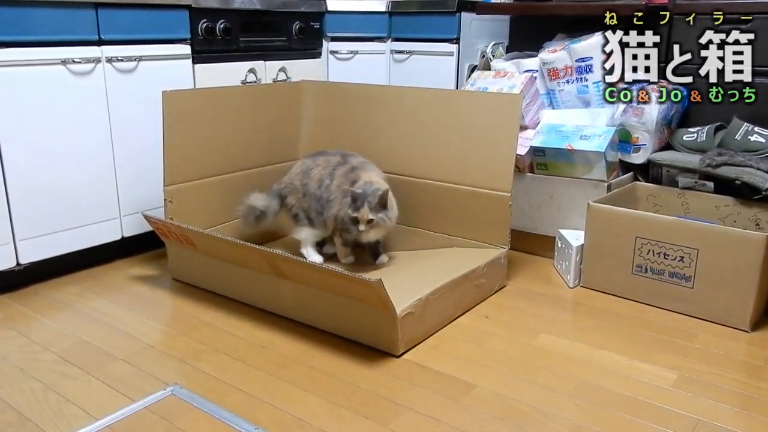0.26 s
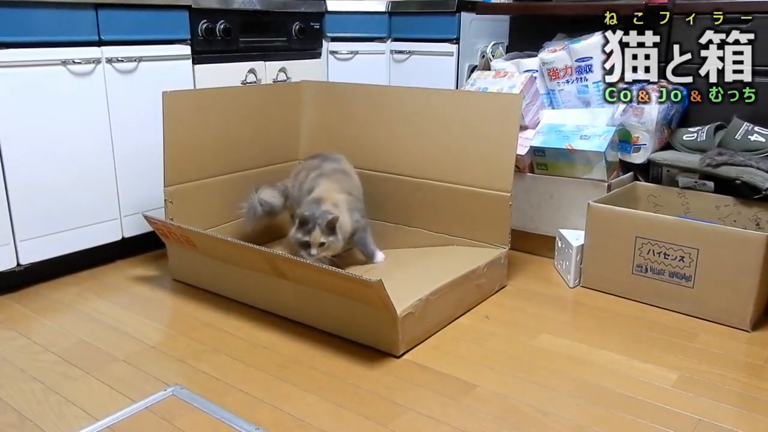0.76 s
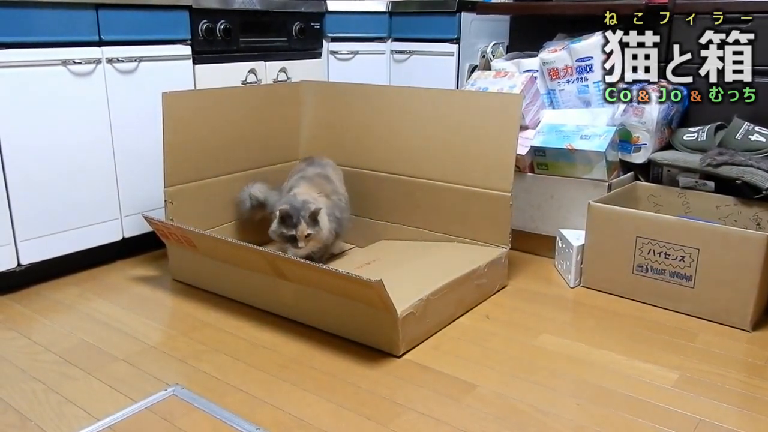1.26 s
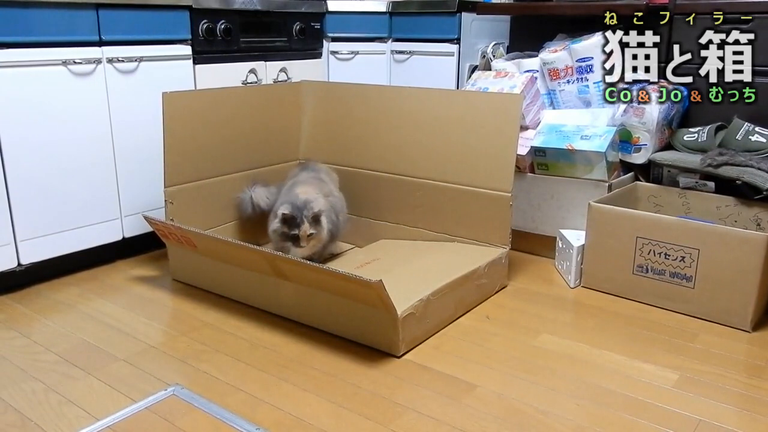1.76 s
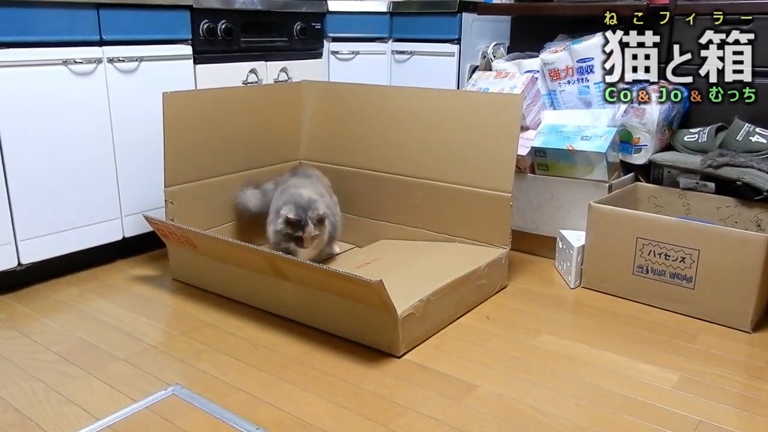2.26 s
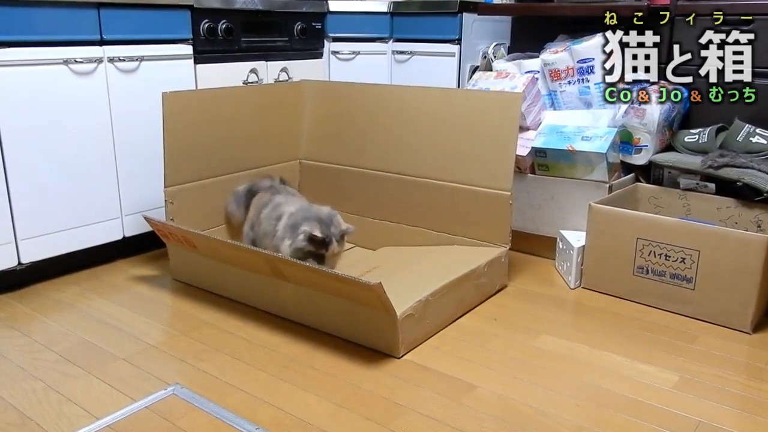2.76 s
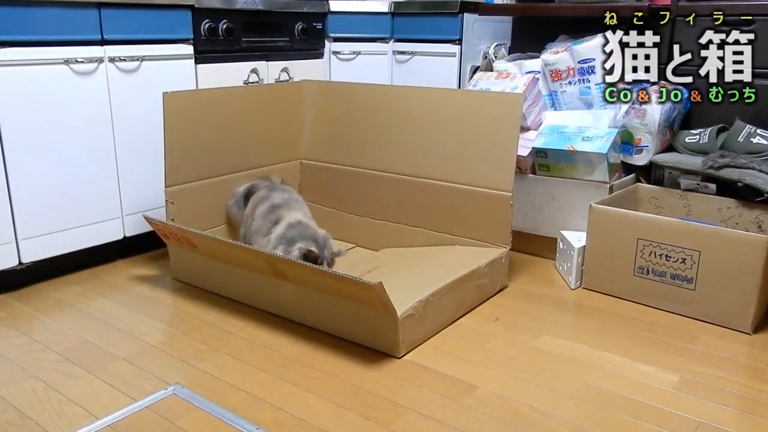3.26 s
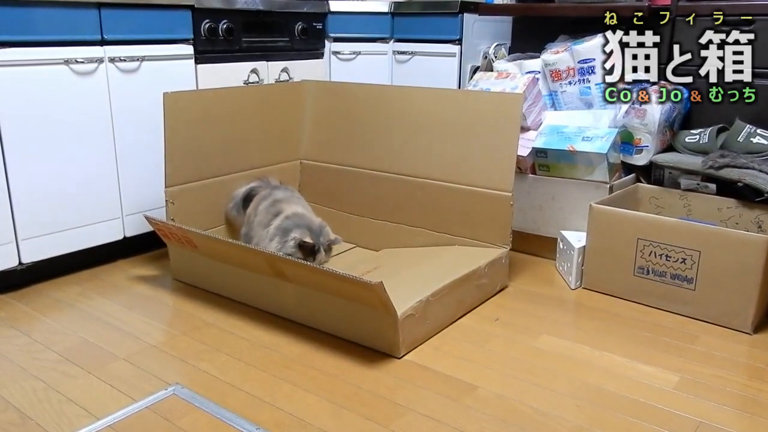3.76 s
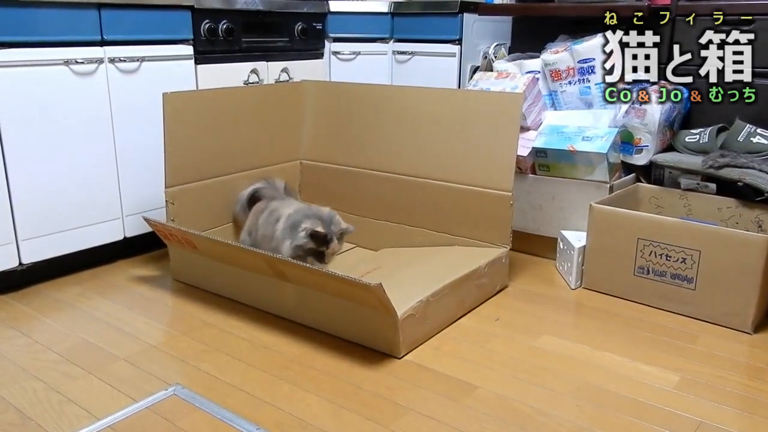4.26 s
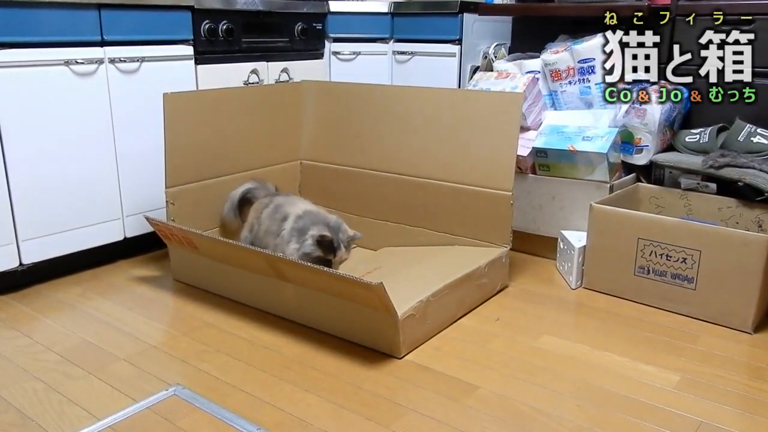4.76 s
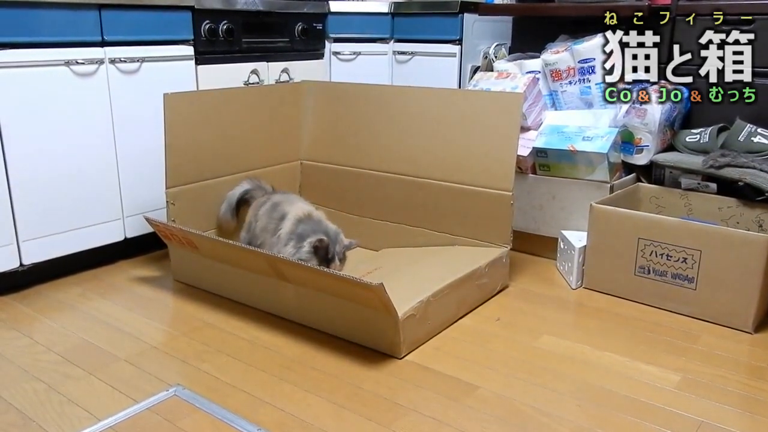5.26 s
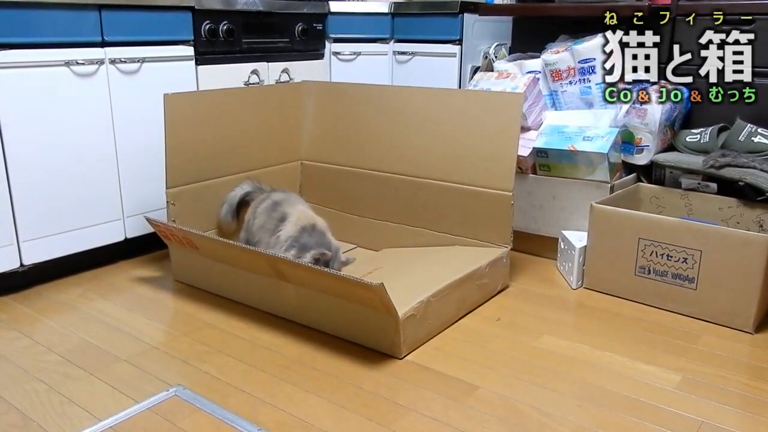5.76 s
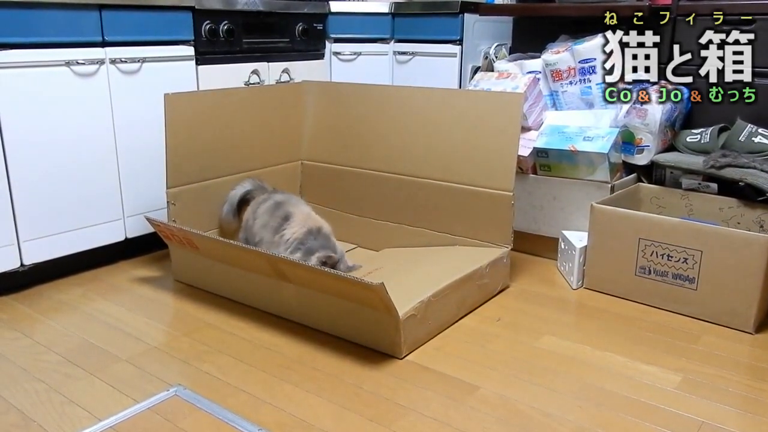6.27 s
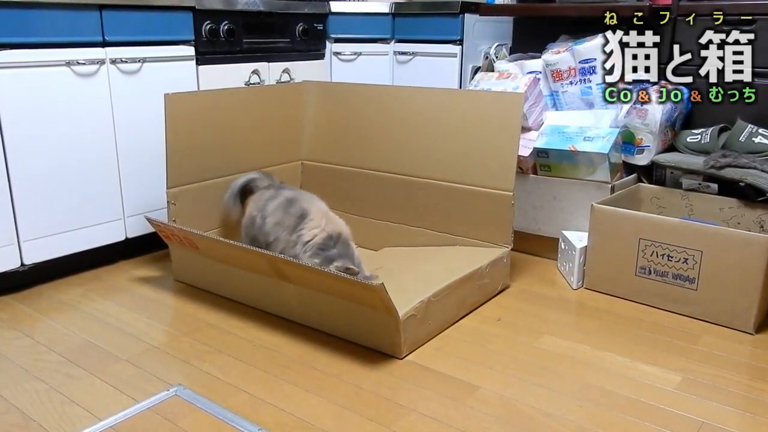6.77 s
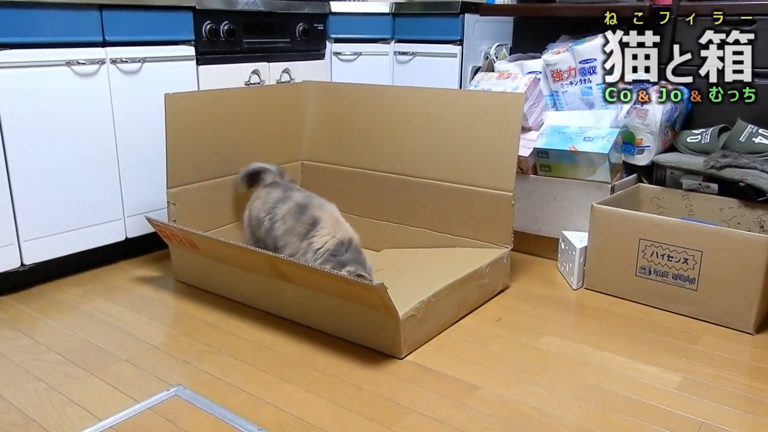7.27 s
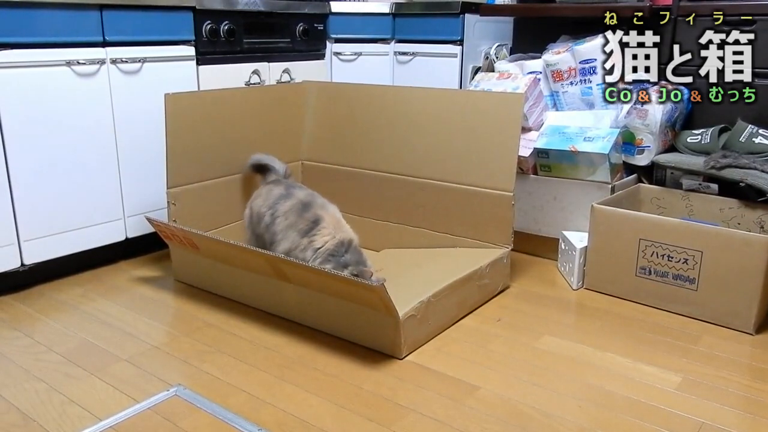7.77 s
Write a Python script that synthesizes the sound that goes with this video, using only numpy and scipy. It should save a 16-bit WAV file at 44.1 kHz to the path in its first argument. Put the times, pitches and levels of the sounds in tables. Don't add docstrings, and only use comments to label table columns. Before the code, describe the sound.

A low, airy fridge and fan hum runs throughout a small kitchen. At first only barely audible fur brushes and tiny collar tag clinks are heard. Then a cat slaps a large cardboard box, its tag jingling, and follows with rasping claw scrapes, light pats and several sharp, hollow whacks. A gentle brushing lull precedes two last thumps. The microphone is about two metres away, with a short hard-room echo.

```python
import sys
import numpy as np
from scipy import signal
from scipy.fft import rfft, irfft
from scipy.io import wavfile
from scipy.ndimage import uniform_filter1d

SR = 44100
rng = np.random.default_rng(int(sys.argv[2]) if len(sys.argv) > 2 else 0)


def voltage_ratio(level):
    return 10 ** (np.asarray(level, float) / 20)


def generate_wav(signal):
    frames = np.transpose(np.atleast_2d(signal))
    scaled = np.clip(frames, -1, 1) * 32767
    pcm = np.round(scaled).astype(np.int16)
    wavfile.write(sys.argv[1], SR, pcm)


N = 353241


def unit(x):
    return x / np.sqrt(np.mean(x ** 2))


def colour(x, table):
    hz, db = np.transpose(table)
    f = np.maximum(np.arange(len(x) // 2 + 1) * SR / len(x), 1)
    gain = voltage_ratio(np.interp(np.log(f), np.log(hz), db))
    return irfft(rfft(x) * gain, len(x))


def resonate(x, hz, q):
    return signal.lfilter(*signal.iirpeak(hz, q, SR), x)


def low_cut(x, hz):
    return signal.sosfilt(signal.butter(2, hz, "highpass", fs=SR, output="sos"), x)


def walk(rate):
    k = int(SR / rate)
    steps = np.repeat(rng.standard_normal(N // k + 1), k)
    return unit(uniform_filter1d(uniform_filter1d(steps, k), k)[:N])


# pitch_hz, level_db (per Hz)
HUM_SPECTRUM = [(16, -58), (28, -4), (54, -7.5), (322, -2), (409, -10.5), (480, -5), (578, -14.5),
                (754, -15.5), (1320, -28.5), (1460, -24.5), (1590, -21), (3710, -26.5), (6830, -36.5),
                (8680, -36.5), (16000, -46)]
HUM_DB = -49
# pitch_hz, width_hz, level_db (rms)
HOUSING = [(330, 47, -61), (480, 130, -65), (763.5, 13.4, -65), (976, 160, -64), (1474, 28, -68),
           (2005, 37, -72), (3750, 210, -72), (4700, 270, -76), (6080, 79, -79)]


def moving_air(waver):
    out = voltage_ratio(HUM_DB - 3.5) * waver * unit(colour(rng.standard_normal(N), HUM_SPECTRUM))
    for hz, width, db in HOUSING:
        out += voltage_ratio(db) * unit(resonate(rng.standard_normal(N), hz, hz / width))
    return out


# pitch_hz, level_db (rms)
MOTOR_TONES = [(118.4, -72), (769.8, -78)]
# pitch_hz, level_db (side minus mid)
HUM_WIDTH = [(60, -24), (110, -3), (200, -8.5), (380, -9.5), (700, -6), (1290, -14.5), (2380, -6),
             (4400, -6), (8120, 0.5), (15000, -1.5)]


def hum():
    t = np.arange(N) / SR
    waver = voltage_ratio(.7 * walk(6))
    tones = np.zeros(N)
    for hz, db in MOTOR_TONES:
        tones += voltage_ratio(db + 3 + 3 * walk(9)) * np.sin(2 * np.pi * hz * t)
    return moving_air(waver) + tones, colour(moving_air(waver), HUM_WIDTH)


# pitch_hz, t60_s
ROOM_T60 = [(100, 0.33), (500, 0.19), (2500, 0.23), (6000, 0.28), (12000, 0.12)]


def tail():
    t, out = np.arange(SR // 2) / SR, np.zeros(SR // 2)
    hz, t60 = np.transpose(ROOM_T60)
    for f in 60 * 2. ** np.arange(9):
        octave = [(f / 2, -40), (f / np.sqrt(2), -3), (f, 0), (f * np.sqrt(2), -3), (2 * f, -40)]
        band = colour(rng.standard_normal(len(t)), octave)
        decay_s = np.interp(np.log(f), np.log(hz), t60)
        out += band * voltage_ratio(-60 * t / decay_s) / np.sqrt(decay_s)
    out *= np.clip((t - .003) / 0.0066, 0, 1)
    return out / np.sqrt(np.sum(out ** 2))


# start_s, lean_right_db, echo_db
PLACES = [(0, -40, 0), (2.6, -32, 0), (2.96, -32, -0.5), (3.62, -30, 0.5), (4.2, -32, -1.5), (4.61, -34, 0),
          (4.9, -35, 1), (5.12, -29, 0.5), (5.52, -32, 0.5), (5.79, -32, 0), (6.2, -30, 0),
          (6.5, -34, -0.5), (7.54, -33, 0.5), (7.81, -32, 0)]
SHARED_ECHO_HZ = 1400


def echo(x, shared, tails):
    out = np.zeros(N + len(shared))
    edges = [int(row[0] * SR) for row in PLACES] + [N]
    bass = [(SHARED_ECHO_HZ, 0), (SHARED_ECHO_HZ * 1.1, -60)]
    for a, b, (_, _, db), fresh in zip(edges, edges[1:], PLACES, tails):
        answer = fresh + colour(shared - fresh, bass)
        out[a:b + len(shared) - 1] += voltage_ratio(db) * signal.fftconvolve(x[a:b], answer)
    return out[:N]


# start_s, length_s, level_db, pitch_hz
RATTLES = [
    (3.163, .25, -52, 7100),
    (3.484, .04, -49, 8100),
    (4.757, .005, -42, 7700),
    (4.7427, .004, -40, 7550),
    (4.7865, .004, -35, 7780),
    (2.7, .004, -34, 7900),
]
# start_s, level_db (peak), pitch_hz
SOFT_CLINKS = [(1.8513, -63, 6140), (1.8823, -53, 6380), (1.8848, -51, 6590), (1.8967, -51, 6710),
               (1.9217, -59, 6610), (1.9386, -51, 6700), (1.9755, -59, 6630), (1.989, -56, 6400),
               (2.0035, -52, 6550), (2.0344, -43, 6460), (2.1636, -51, 6620), (2.1811, -55, 6640),
               (2.221, -49, 6790), (2.2345, -50, 6640), (2.3023, -55, 6830), (2.3427, -55, 6820),
               (2.3662, -57, 6610), (2.4101, -48, 6610), (2.4899, -56, 7220), (2.5353, -57, 7130)]
# start_s, level_db (peak), pitch_hz
LOUD_CLINKS = [
    (2.7654, -39, 6480),
    (2.7888, -36, 6530),
    (2.7958, -32, 6480),
    (2.8192, -27, 6360),
    (2.8392, -33, 6700),
    (2.8571, -31, 6480),
    (2.8956, -30, 6510),
    (2.9285, -35, 6500),
    (2.9629, -34, 6520),
    (2.9918, -32, 6460),
]
TICK_GAP_S, TICK_SCATTER_DB, TICK_DETUNE = 0.015, 3, .008


def ticks():
    chance = rng.standard_normal((len(RATTLES), 3, 24))
    out = []
    for (s, length, db, hz), (gap, size, tune) in zip(RATTLES, chance):
        late = np.cumsum(TICK_GAP_S * np.exp(0.24 * gap)) - TICK_GAP_S * np.exp(.3 * gap[0])
        rattle = zip(s + late, db + TICK_SCATTER_DB * size, hz * (1 + TICK_DETUNE * tune))
        out += list(rattle)[:np.sum(late <= length)]
    return out + [(s, db - 6, hz) for s, db, hz in SOFT_CLINKS + LOUD_CLINKS]


def tag():
    out, t = np.zeros(N), np.arange(SR // 10) / SR
    for s, db, hz in ticks():
        turns = 2 * np.pi * hz * t
        modes = np.sin(turns) + .6 * np.sin(1.03 * turns) + .3 * np.sin(1.17 * turns)
        clink = modes * np.exp(-t / .003) + .3 * np.sin(turns) * np.exp(-t / .016)
        i = int(s * SR)
        out[i:i + len(t)] += voltage_ratio(db + 7.0) * clink * (1 - np.exp(-t / .0005))
    return out


# start_s, level_db, pitch_hz, t60_s
PLUCKS = [(4.7424, -50, 2510, 0.24), (4.7864, -44, 2520, 0.12), (4.9277, -37, 2470, 0.14),
          (5.8136, -41.5, 2370, 0.42), (6.0087, -36.5, 1970, 0.15), (6.5525, -47, 2110, 0.16),
          (7.1504, -41, 3130, 0.11), (7.1844, -46, 3060, 0.076), (1.1667, -61, 4900, 0.2),
          (4.9282, -36, 6140, 0.099), (5.1482, -32, 6540, 0.081), (7.1511, -42, 5100, 0.1),
          (7.2469, -48, 3750, 0.073), (7.725, -41, 5000, 0.093)]


def plucks():
    out, t = np.zeros(N), np.arange(SR // 4) / SR
    for s, db, hz, t60 in PLUCKS:
        noise = rng.standard_normal(len(t))
        band = unit(resonate(resonate(noise, hz, 11.0), hz, 11.0))
        i = int(s * SR)
        out[i:i + len(t)] += band * (1 - np.exp(-t / 0.004)) * voltage_ratio(db + 1.5 - 60 * t / max(t60, .02))
    return out


# start_s, level_db (peak), pitch_hz, t60_s
CATCHES = [(2.654, -12, 2840, 0.021), (2.9846, -29, 6860, 0.025), (3.1031, -27, 6690, 0.021),
           (3.7212, -12, 2600, 0.021), (3.7268, -12, 2180, 0.021), (4.321, -23, 3830, 0.025),
           (4.3284, -19.5, 3360, 0.025), (4.3435, -19, 2800, 0.025), (4.37, -17, 2500, 0.025),
           (4.392, -21, 2470, 0.025), (4.664, -28, 3200, 0.025), (4.677, -33, 2800, 0.025),
           (4.742, -33, 7550, 0.023), (4.786, -30, 7780, 0.023), (5.1471, -27, 3980, 0.025),
           (5.1576, -24, 5530, 0.025), (5.5497, -19, 2470, 0.021), (6.0051, -31, 2000, 0.025),
           (6.2499, -12, 2390, 0.022), (7.1544, -30, 5100, 0.023), (7.2454, -40, 3940, 0.025),
           (7.5824, -15, 2810, 0.021), (7.8379, -12.5, 2680, 0.023)]


def catches():
    out, t = np.zeros(N), np.arange(SR // 20) / SR
    for s, db, hz, t60 in CATCHES:
        noise = rng.standard_normal(len(t))
        band = unit(resonate(resonate(noise, hz, 1.5), hz, 1.8))
        i = int(s * SR)
        out[i:i + len(t)] += band * (1 - np.exp(-t / 0.00039)) * voltage_ratio(db - 5.5 - 60 * t / max(t60, .005))
    return out


# start_s, level_db, pitch_hz, t60_s
THUDS = [(2.652, -23.5, 122, 0.34), (2.699, -19, 200, 0.067), (2.797, -29, 113, 0.1),
         (3.706, -19.5, 199, 0.25), (4.343, -24, 161, 0.22), (4.643, -27.5, 178, 0.12),
         (4.924, -21.5, 160, 0.31), (5.535, -20, 206, 0.11), (5.812, -55, 199, 0.15),
         (6.006, -24, 199.5, 0.19), (6.232, -23, 197, 0.13), (7.558, -24, 162, 0.057),
         (7.823, -23, 250, 0.082), (7.834, -11.5, 204, 0.055), (7.566, -25, 269, 0.12),
         (3.78, -42, 52, 0.34), (6.26, -40, 55, 0.43), (2.653, -23, 268, 0.42), (4.926, -17, 276.5, 0.2),
         (2.668, -27, 91.4, 0.4), (2.77, -35, 78.1, 0.21), (2.87, -43, 57, 0.81), (4.359, -36.5, 90, 0.33),
         (7.565, -37, 96, 0.41), (6.24, -21, 197, .14), (5.545, -23, 200, .14), (7.87, -27, 225, .2),
         (7.59, -30, 240, .2), (4.94, -28, 200, .15)]
# start_s, level_db, pitch_hz, t60_s
KNOCKS = [(2.656, -19, 545, 0.14), (2.727, -33, 530, 0.1), (2.793, -22.5, 548, 0.089),
          (2.985, -29, 628, 0.23), (3.103, -40, 700, 0.09), (3.507, -33, 582, 0.097),
          (7.745, -39, 480, 0.08), (3.29, -30.5, 539, 0.27), (3.714, -15.5, 542, 0.11),
          (5.538, -22, 580, 0.071), (6.237, -9, 583, 0.062), (7.572, -24, 350, 0.14),
          (7.565, -23, 615, 0.091), (7.562, -24, 930, .04), (7.838, -19, 590, .08), (7.852, -25, 300, .15),
          (7.835, -20, 800, 0.055), (3.712, -26, 355, .1), (3.71, -22, 272, .14), (3.71, -25, 1074, .08),
          (7.103, -39, 980, .04), (4.315, -32, 550, .05), (4.41, -30, 480, .08), (4.665, -26, 500, .08),
          (5.178, -29, 690, 0.088), (7.44, -41, 440, 0.11), (7.735, -34, 340, .1), (7.275, -41, 780, 0.11),
          (4.7, -24, 270, .12), (5.545, -24, 352, .12), (6.24, -22, 352, 0.13), (6.24, -22, 268, .12),
          (4.665, -33, 1200, .06)]


def thuds():
    out, t = np.zeros(N), np.arange(SR // 2) / SR
    for s, db, hz, t60 in THUDS + KNOCKS:
        turns = 2 * np.pi * hz * (t + 0.0023 * (1 - np.exp(-t / 0.055)))
        pair = np.sin(turns) + .35 * np.sin(.9 * turns)
        landing = pair * (1 - np.exp(-t / 0.00045)) * voltage_ratio(db + 1.0 - 60 * t / max(t60, .02))
        i = int(s * SR)
        out[i:i + len(t)] += landing[:N - i]
    return out


# start_s (full grip), hold_s, rub_db, pad_db (rel), claws_db (rel)
SCRAPES = [(2.681, 0.0043, -34.5, 1.5, 1.5), (2.762, .005, -45, 2.5, 5.5), (2.83, 0.043, -45, 1.5, 1),
           (2.984, 0.012, -37.5, 1, -5), (3.084, 0.2, -44.5, 6, 1.5), (3.352, 0.06, -46, 9, 0),
           (4.342, 0.048, -33, 0, 1.5), (4.4, 0.029, -40.5, 3.5, -4), (4.666, 0.012, -53, 6, -11),
           (3.03, 0.032, -48, 2, -1), (4.651, 0.0044, -44.5, 12, -1.5), (4.798, .005, -52.5, 2.5, 7),
           (5.162, 0.0061, -31, 1, -16), (5.223, 0.12, -43, 4.5, -2.3), (5.486, 0.0061, -51.5, 12.5, -1),
           (5.836, .005, -43.5, 10, 2.5), (5.944, 0.032, -57, 15.5, 1), (7.708, 0.012, -47.5, 7, -12)]
# start_s (full grip), hold_s, rub_db, pad_db (rel), claws_db (rel)
BRUSHES = [(0.926, 0.033, -70.5, 13.5, 11.5), (1.043, .02, -77.5, 20, 14), (1.16, 0.028, -64, -3, -0.5),
           (1.28, .02, -69.5, 14, -2), (1.95, .5, -80, 0, 17), (2.54, 0.068, -60.5, -7, 0.5),
           (3.507, 0.062, -68, 5, 12.5), (3.693, 0.013, -63.5, 7, 13), (4.259, 0.0097, -56, -1, 4),
           (5.739, 0.017, -60, 18.5, -4), (6.1, 0.13, -69, 12, -3), (6.45, 0.91, -68, 5.5, 3),
           (6.56, .005, -57, 11.5, -1), (6.843, .01, -81, 12, -4), (6.966, 0.046, -63.5, -2, 5.5),
           (7.066, 0.013, -61, 15, 3), (7.138, .005, -56.5, -17, 10), (7.264, 0.026, -52.5, 6, -1),
           (7.388, .005, -58, 11, -2), (7.48, 0.018, -60.5, 9.5, 2), (7.837, .005, -50.5, 20.5, 6)]
GRIP_DB_PER_S, SAG_DB_PER_S, LIFT_DB_PER_S = 704, 1, 224
STROKE_BIG_DB = -0.5


def drag_force(part):
    out, t = np.zeros(N), np.arange(N) / SR
    for s, hold, db, pad, claws in SCRAPES + BRUSHES:
        part_db = {"skin": 0, "big": pad + STROKE_BIG_DB, "small": pad, "fibres": claws}[part]
        i = slice(int((s - .1) * SR), int((s + hold + .3) * SR))
        since = t[i] - s
        shape_db = GRIP_DB_PER_S * np.minimum(since, 0) - SAG_DB_PER_S * np.clip(since, 0, hold)
        shape_db -= LIFT_DB_PER_S * np.maximum(since - hold, 0)
        out[i] = np.hypot(out[i], voltage_ratio(db + part_db + shape_db))
    return out


# start_s, crack_db, big_panels_db (rel), small_panels_db (rel), contact_s
SLAPS = [
    (2.6517, -9.5, -24, -15.5, 0.008),
    (3.706, -6, -15.5, -16, 0.024),
    (4.9264, -19, 15.5, 6.5, 0.0048),
    (5.5326, -4.5, -8.5, -16.5, 0.016),
    (6.2288, 0, 3, -7.5, 0.0051),
    (7.5602, -5.5, -15, -15, 0.025),
    (7.833, -17.5, -5, -0.5, 0.033),
]
# start_s, crack_db, pad_db (rel), claws_db (rel), contact_s
PATS = [(2.788, -43.5, 4, 18, 0.0068), (2.9798, -36, -7.5, -1, 0.028), (3.1032, -36, 9, 13, 0.004),
        (3.5024, -35, -9.5, -15, 0.023), (4.3195, -27.5, -14.5, -4, 0.018),
        (4.345, -17.5, -23, -4.5, 0.017), (4.639, -43, -17, -3, 0.025), (4.6639, -27.5, -10, -28, 0.028),
        (4.7427, -47, -14, 13.5, 0.031), (5.145, -37.5, -32, 6, 0.042), (5.7344, -35.5, -10, -21, 0.011),
        (5.8103, -26, -4.5, -2.5, 0.021), (5.936, -39.5, -3, -11, 0.012), (6.004, -31.5, -3.5, -8, 0.03),
        (6.549, -43, -11, -8, 0.032), (6.8097, -49.5, -13, -7, 0.032), (7.103, -35, -2, -9, 0.0071),
        (7.1526, -25, -41, -10, 0.0092), (7.237, -45, -20, 0, 0.018), (7.4203, -40, -8, -12, 0.02),
        (7.716, -43, 4, 1, 0.029)]
SLAP_SNAP_DB = -21.5
PAT_BIG_DB = -4


def blows():
    out = []
    for s, db, big, small, contact in SLAPS:
        out.append((s, contact, {"skin": db, "big": db + big, "small": db + small, "fibres": SLAP_SNAP_DB}))
    for s, db, pad, claws, contact in PATS:
        levels = {"skin": db, "big": db + pad + PAT_BIG_DB, "small": db + pad, "fibres": db + claws}
        out.append((s, contact, levels))
    return out


def blow_force(part, trim_db, rise_s, stretch, settle_db=-60, settle_s=.03):
    out, t = np.zeros(N), np.arange(SR // 4) / SR
    for s, contact_s, levels in blows():
        i, contact = int(s * SR), max(contact_s, .003) * stretch
        fade = np.exp(-(t / contact) ** 2) + voltage_ratio(settle_db) * np.exp(-t / settle_s)
        push = (1 - np.exp(-t / rise_s)) * fade
        out[i:i + len(t)] += voltage_ratio(levels[part] + trim_db) * push[:N - i]
    return out


def grit(spread_db, patchy_db):
    sizes = voltage_ratio(spread_db * np.minimum(rng.exponential(size=N), 4) + patchy_db * walk(250))
    return unit(rng.standard_normal(N) * sizes)


def shaped(source, envelope, body, push=0):
    return body(source * envelope + push) / np.sqrt(np.mean(body(source) ** 2))


def ring(x, modes):
    out = np.zeros(len(x))
    for k, (hz, db, t60) in enumerate(modes):
        pole = np.exp((2j * np.pi * hz - np.log(1000) / t60) / SR)
        out += (-1) ** k * voltage_ratio(db) * signal.lfilter([1], [1, -pole], x).imag
    return out


# delay_s, level_db
TOES = [
    (0, -13),
    (.0075, 0),
    (.0155, 0),
    (.028, -6),
    (.04, -8),
]


def panels(modes, part, tap_s):
    source = grit(3.0, 2.5)
    tap = blow_force(part, 13.0, tap_s, 0.033)
    taps = sum(voltage_ratio(db) * np.roll(tap, int(delay * SR)) for delay, db in TOES)
    force = blow_force(part, 1.5, .005, .9) + drag_force(part)
    return shaped(source, force, lambda x: ring(x, modes), taps)


# pitch_hz, level_db, t60_s
BIG_PANELS = [(161, -7, 0.1), (201.3, -2.5, 0.11), (230, -8.5, 0.063), (269, 2, 0.12), (354.8, 3, 0.1)]
# pitch_hz, level_db, t60_s
SMALL_PANELS = [(440, -4.5, 0.086), (480, -8.5, 0.023), (551, 1.5, 0.05), (620, -1, 0.048),
                (706, -15, 0.04), (789, -19, 0.06), (883, -3, 0.028), (1067, -2, 0.025), (1202, -6, 0.015)]
# pitch_hz, level_db (per Hz)
STRUCK_SKIN = [(760, -2.5), (1300, -13), (1520, -22), (1760, -3), (2270, -0.5), (2460, 3.5), (2820, 3),
               (3080, -1), (4010, -3.5), (5800, -12.5), (7540, -19), (12800, -120)]
# pitch_hz, level_db (per Hz)
STRUCK_FIBRES = [(2940, -11), (5000, -8), (8420, -2.5), (9840, -8.5), (11800, -27), (13600, -32),
                 (15500, -46)]
# pitch_hz, level_db (per Hz)
SCRAPED_SKIN = [(760, -46), (1300, -33), (1470, -19), (1950, -2.5), (2450, 0), (3100, -5), (3430, -0.5),
                (5800, -0.5), (7540, -10), (12800, -120)]
# pitch_hz, level_db (per Hz)
SCRAPED_FIBRES = [(2940, -7.5), (5000, -15), (5800, -23), (6330, -6.5), (7670, 1), (14000, -15),
                  (14800, -22), (15800, -31)]
STICK_DB, STICKS_PER_S = .6, 45


def box():
    big = panels(BIG_PANELS, "big", tap_s=.0006)
    small = panels(SMALL_PANELS, "small", tap_s=.0003)
    struck = grit(3.0, 2.2)
    rubbed = grit(3.0, 1.7) * voltage_ratio(STICK_DB * walk(STICKS_PER_S))
    crack_force = blow_force("skin", -14.0, 0.0022, 1.04, settle_db=-3.0, settle_s=0.03)
    snap_force = blow_force("fibres", -7.0, 0.00048, 1.45, settle_db=-24.5, settle_s=0.075)
    crack = shaped(struck, crack_force, lambda x: colour(x, STRUCK_SKIN))
    snap = shaped(struck, snap_force, lambda x: colour(x, STRUCK_FIBRES))
    rasp = shaped(rubbed, drag_force("skin"), lambda x: colour(x, SCRAPED_SKIN))
    scratch = shaped(rubbed, drag_force("fibres"), lambda x: colour(x, SCRAPED_FIBRES))
    return big + small + crack + snap + rasp + scratch


MOTTLE_EDGES_HZ = (1500, 2300, 3400, 5000, 7000, 10000)
MOTTLE_DB, MOTTLES_PER_S = 2.2, 40


def mottle(x):
    lows = [signal.sosfilt(signal.butter(2, hz, fs=SR, output="sos"), x) for hz in MOTTLE_EDGES_HZ] + [x]
    out = lows[0]
    for lower, upper in zip(lows, lows[1:]):
        out = out + (upper - lower) * voltage_ratio(MOTTLE_DB * walk(MOTTLES_PER_S))
    return out


# pitch_hz, level_db (side minus mid)
ECHO_WIDTH = [(30, -4), (60, -13), (110, -27), (200, -32), (380, -36), (700, -22), (1290, -23), (2380, -33),
              (4400, -25.5), (8120, -10), (15000, 1)]


def scene():
    hum_mid, hum_side = hum()
    board = low_cut(box(), 120)
    near = mottle(board) + thuds() + plucks() + tag() + catches()
    walls, far_walls = tail(), tail()
    tails = [tail() for _ in PLACES]
    echo_tone = [(200, -15.5), (800, -14), (2000, -11.5), (8000, -11)]
    mid = voltage_ratio(-4.0) * near + colour(echo(near, walls, tails), echo_tone)
    side = colour(voltage_ratio(-5.0) * echo(near, far_walls, tails[::-1]), ECHO_WIDTH)
    starts, leans_db, _ = np.transpose(PLACES)
    place = np.searchsorted(starts, np.arange(N) / SR, "right") - 1
    side = side - near * voltage_ratio(leans_db[place] - 9)
    mid, side = mid + hum_mid, side + hum_side
    return np.array([voltage_ratio(-.4) * (mid + side), mid - side])


def band_limit(x):
    return signal.sosfilt(signal.butter(12, 16130, fs=SR, output="sos"), x)


def record(dry):
    thin = low_cut(dry, 45)
    thin = signal.sosfilt(signal.ellip(8, .2, 60, 15800, fs=SR, output="sos"), thin)
    return band_limit(thin)


dry = scene()
out = record(dry)
generate_wav(out)
```